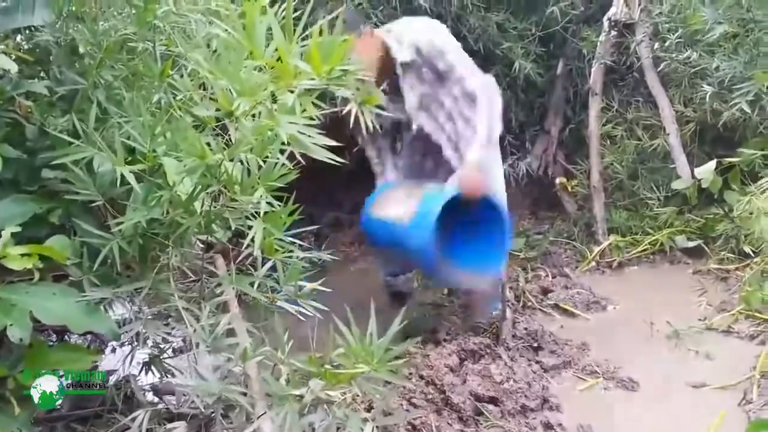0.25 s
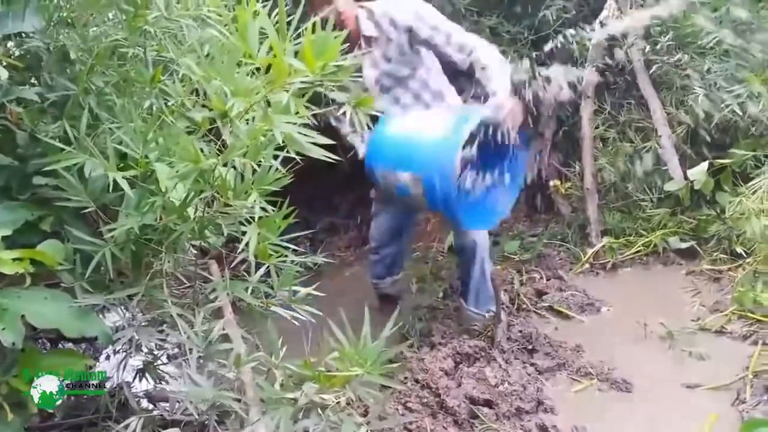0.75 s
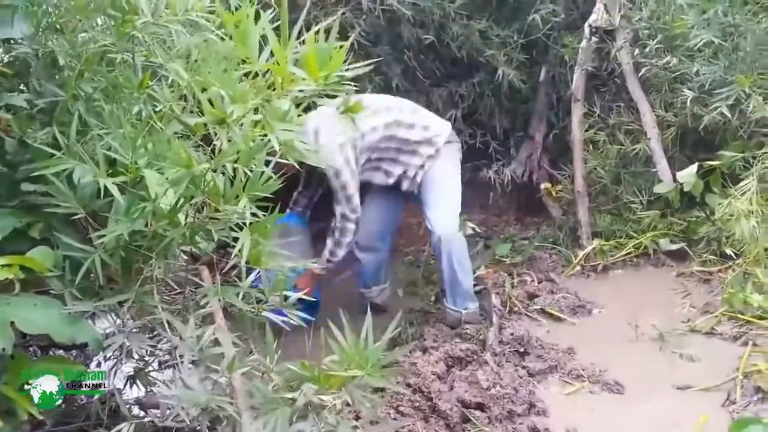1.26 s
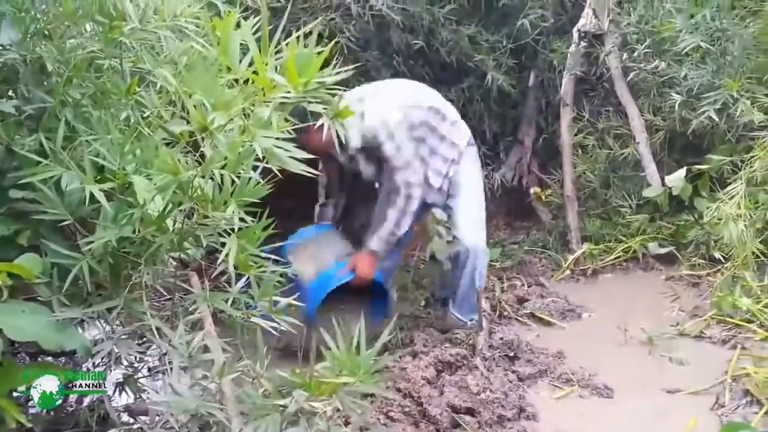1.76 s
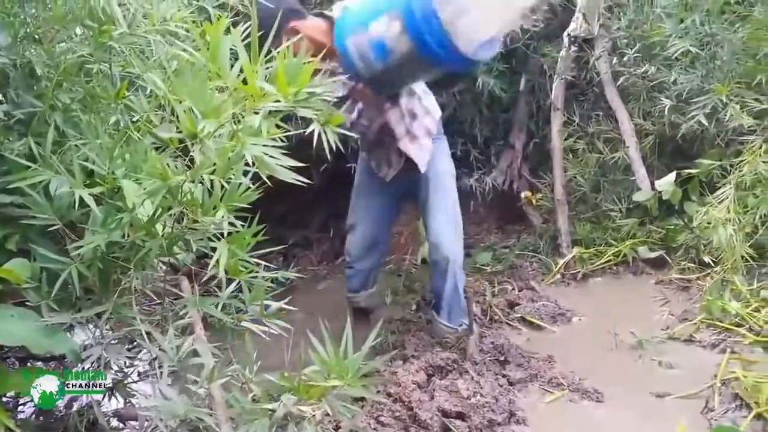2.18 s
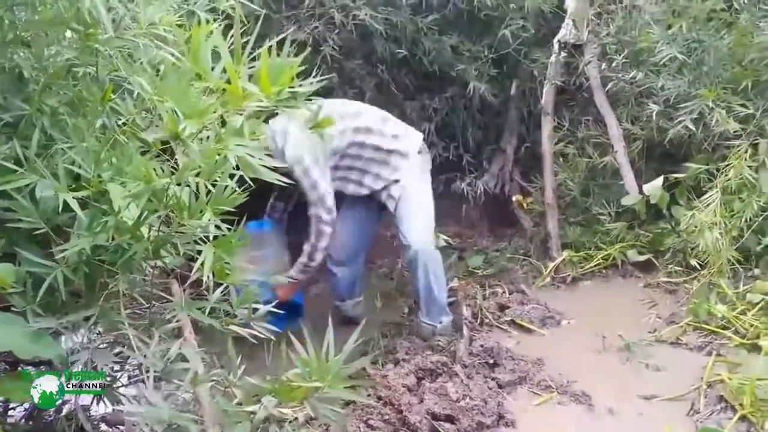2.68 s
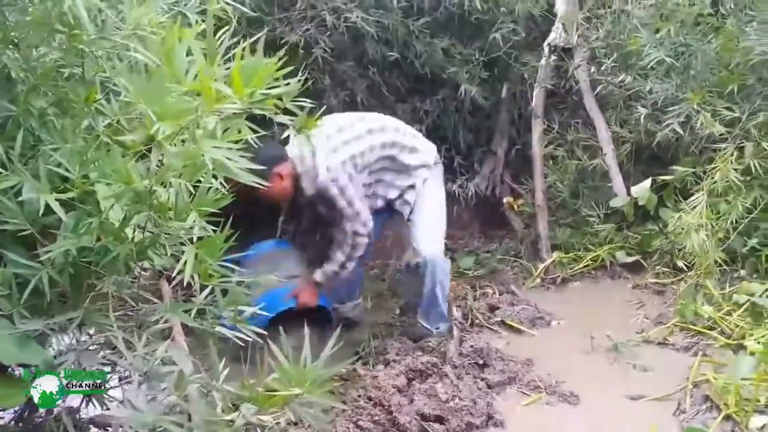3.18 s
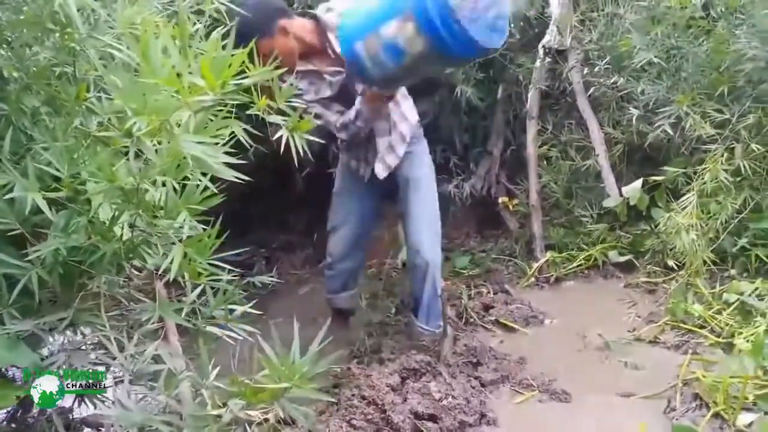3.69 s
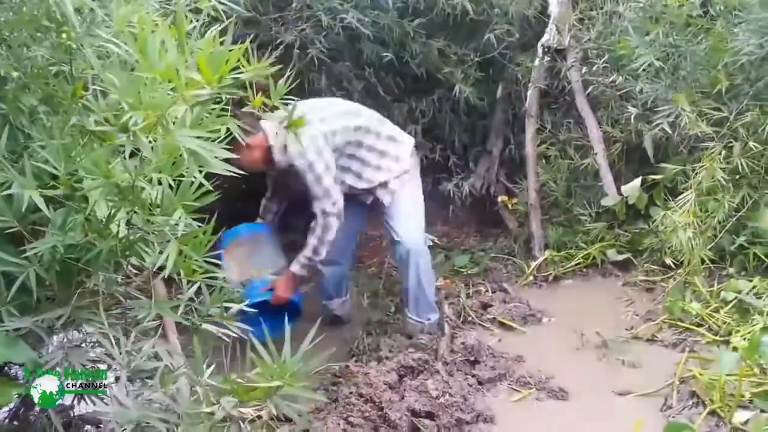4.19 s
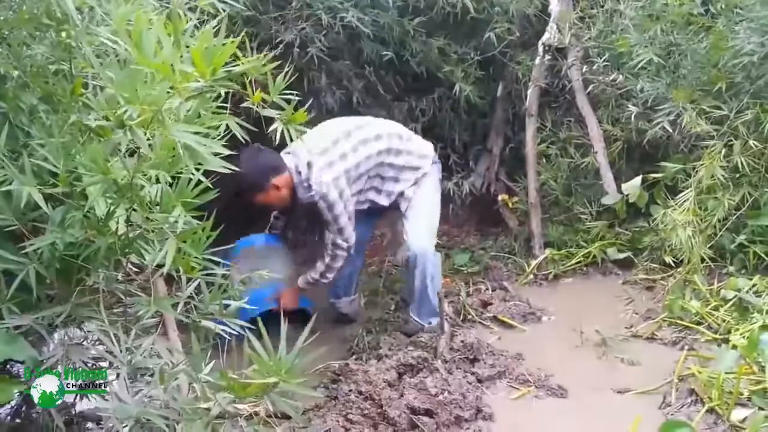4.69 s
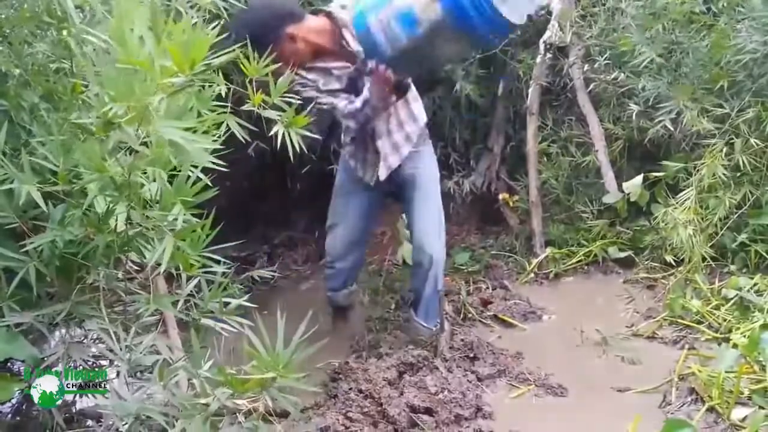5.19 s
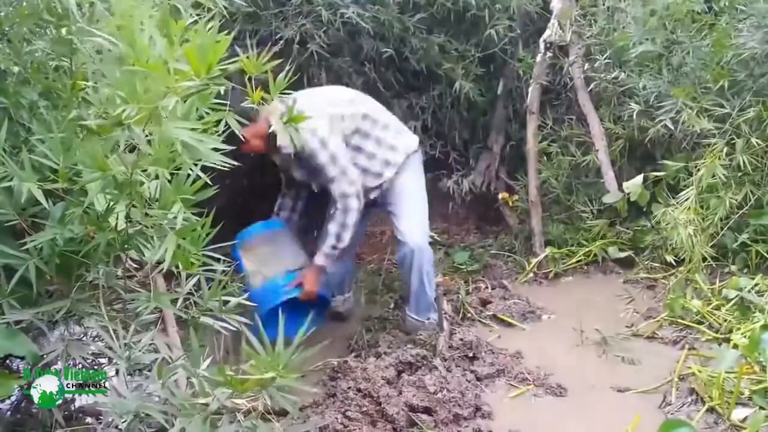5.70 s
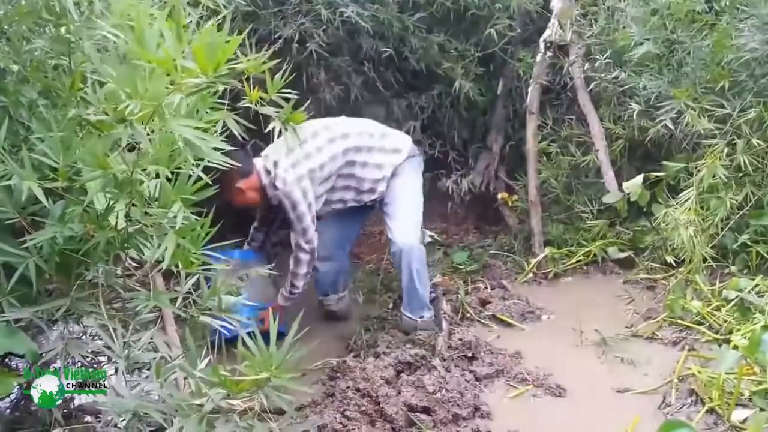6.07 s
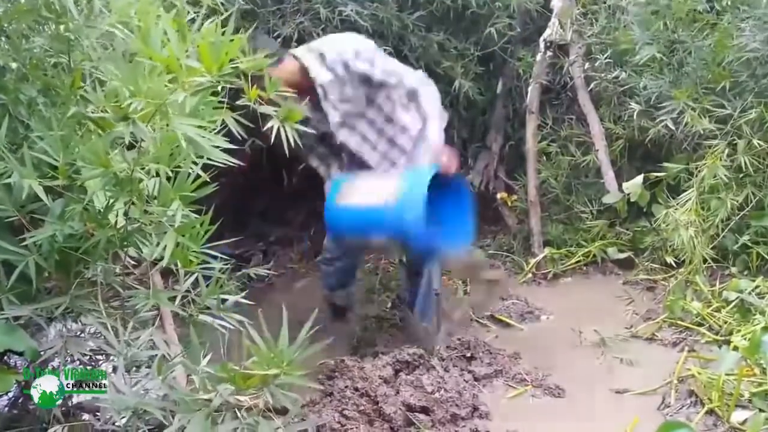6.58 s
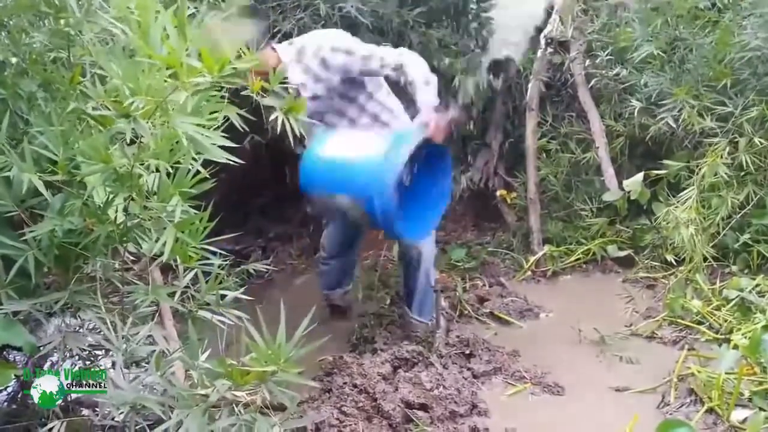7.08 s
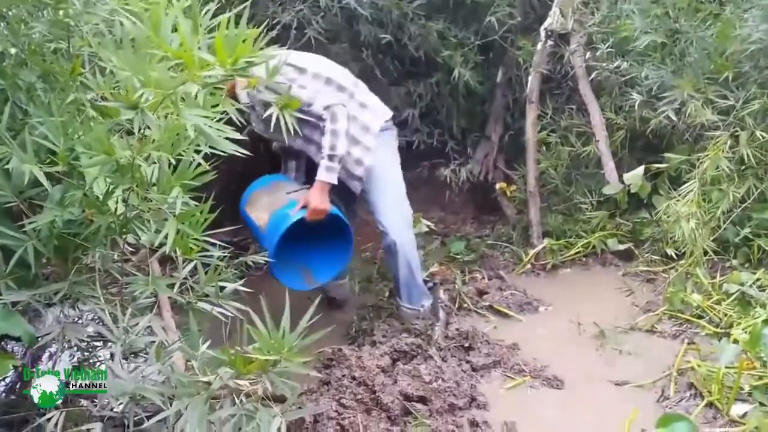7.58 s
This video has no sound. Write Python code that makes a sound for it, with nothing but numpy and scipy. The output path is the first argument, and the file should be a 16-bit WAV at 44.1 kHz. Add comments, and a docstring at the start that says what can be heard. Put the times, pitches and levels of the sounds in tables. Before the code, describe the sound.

A plastic bucket bails muddy water among bushes, heard fairly close in dry open air over faint steady hiss. At the start, a tail of falling drops and a low gulp lead to dull knocks at 0.2 s, a splashy rush and a hollow clack near 0.45. Water showers on leaves from 1.0 to 1.5 with wet smacks. A quiet dip around 1.6 gurgles; the second pour rushes from 1.85 to 2.3, clacking at 2.1 and 2.4, with its shower peaking near 2.9. The third dip gulps at 3.1, knocks and pours from 3.35, clatters at 3.6, and patters down from 4.1 to 4.75. The fourth haul starts at 4.86, louder, with sharp clatter around 5.1 and a lighter shower from 5.6 to 6.3. The fifth brings heavy thuds and deep loud gulps at 6.5, a short strong rush, a clack at 6.8, light taps near 7.1, and a final shower swelling towards 7.6.

```python
"""A plastic bucket bails a muddy pool among bushes, five throws: noise cracks and decaying wall modes make
its dull knocks when full and its clatter when nearly empty. Rising sine bubbles gulp as it dips, and
patter, ringing drops and gurgle make the rush over its lip. Loads come down as showers of the same water
on leaves and mud, with smacks of chattering noise; a faint coloured hiss lies behind."""
import sys
import numpy as np
from scipy import signal
from scipy.fft import rfft, irfft, next_fast_len
from scipy.io import wavfile
from scipy.ndimage import uniform_filter1d

SR = 44100
rng = np.random.default_rng(int(sys.argv[2]) if len(sys.argv) > 2 else 0)


def store_wav(level_fs):
    """Save 16-bit WAV to argv[1]."""
    pcm = np.round(np.clip(np.atleast_2d(level_fs), -1, 1) * 32767)
    wavfile.write(sys.argv[1], SR, pcm.T.astype(np.int16))


N = 346163
TIME = np.arange(N) / SR
HIT_TIME = TIME[:SR // 3]
LEAD_S = .015  # room for the scrape ahead of a contact


def undb(db):
    """Decibels to gain."""
    return 10 ** (np.asarray(db) / 20)


def level(x, db=0):
    """Scale a sound to an rms level."""
    return x * undb(db) / np.sqrt(np.mean(x ** 2))


def add(out, s, sound):
    """Mix a sound in at a given time."""
    start = max(int(s * SR), 0)
    out[..., start:start + sound.shape[-1]] += sound[..., :N - start]


def along(points, hz):
    """Read (Hz, value) points on a log-frequency axis."""
    f, value = np.transpose(points)
    return np.interp(np.log(hz + 1), np.log(f), value)


def ramp(t, length):
    """Rise from 0 to 1 over a given time."""
    return np.clip(t / length, 0, 1)


def fall(t, db_per_s):
    """Hold full gain until time 0, then fade steadily."""
    return undb(-db_per_s * np.maximum(t, 0))


def place(pair, colour, balance, alike_hz=1100, tilt=0):
    """Colour two unrelated sounds causally into left and right: alike in the bass, apart in the treble."""
    size = next_fast_len(pair.shape[1] + 2048, True) // 2 * 2
    hz = np.arange(size // 2 + 1) * SR / size
    turn = np.pi / 4 * (hz + 1) / np.hypot(hz + 1, alike_hz)
    mid, side = rfft(pair, size)
    shared, apart = mid * np.cos(turn), side * np.sin(turn)
    ears = np.array([shared + apart, shared - apart])
    lean = undb(along(balance, hz))
    pan = np.array([lean, np.ones_like(lean)]) / np.hypot(lean, 1)
    # fold the cepstrum forward in time for a minimum-phase filter
    log_gain = np.log(undb(along(colour, hz))) + tilt * np.log(np.clip(hz, 700, 6000) / 2000)
    cepstrum = irfft(log_gain)
    causal = np.exp(rfft(2 * cepstrum[:size // 2], size) - cepstrum[0])
    return irfft(ears * causal * pan)[:, :pair.shape[1]]


def contacts(length, rate, bounce, scrape=0):
    """A brief scrape swells into one sharp contact, followed by a dying chatter of smaller ones."""
    t = HIT_TIME - LEAD_S
    before = scrape * undb(20 * np.minimum(t, 0) / LEAD_S)
    after = bounce * undb(-40 * np.abs(t) / np.clip(length, .004, .25))
    size = np.where(t < 0, before, after)
    train = (rng.random(len(t)) < rate / SR) * rng.standard_normal(len(t)) * size
    train[int(LEAD_S * SR)] = 1
    return train[None]


def burst(t60):
    """Two unrelated bursts of noise that die away exponentially."""
    return rng.standard_normal((2, len(HIT_TIME))) * np.exp(-np.log(1000) * HIT_TIME / t60)


def attack(x):
    """Scale a blow to unit rms over its loudest 8 ms."""
    return x / np.sqrt(uniform_filter1d(np.mean(np.atleast_2d(x), axis=0) ** 2, SR // 125).max())


# What the bucket wall rings with. Each row: pitch in Hz, relative level in dB, t60 in s at a damping of 1.
WALL_MODES = [(145.8, -8, 0.26), (424, -12, 0.067), (785, -6, 0.24), (903.5, 1, 0.14), (964, 7, 0.053),
              (1269, -1.5, 0.14), (1348, 0, 0.098), (1630, -25, 0.099), (2070, -1, 0.14),
              (2440, -1.5, 0.14), (2570, 1.5, 0.2), (2848, 6, 0.059), (3860, -12, 0.043)]
# Stereo lean of the bucket. Each row: frequency in Hz, left minus right in dB.
BUCKET_LEAN = [(400, 2.5), (950, 1.5), (2300, 16), (4400, 16), (7500, 4), (10500, -42)]


def bucket_ring(damping):
    """The wall's modes die away together, weighted and detuned a little at random for each blow."""
    hz, db, t60 = np.transpose(WALL_MODES)[:, :, None]
    weight, detune, phase = rng.standard_normal((3, len(hz), 1))
    modes = undb(db + 0.65 * weight) * np.exp(-np.log(1000) * HIT_TIME * damping / t60)
    modes = modes * np.sin(2 * np.pi * hz * (1 + 0.0047 * detune) * HIT_TIME + np.pi * phase)
    lean = undb(along(BUCKET_LEAN, hz))
    return np.array([np.sum(modes * side / np.hypot(lean, 1), axis=0) for side in (lean, 1)])


def blows(s, db, gap, rebound_db, length):
    """A knock lands twice: first contact and rebound, each as (s, dB, chatter s); the first chatters less."""
    return [(s, db, 0.9 * length), (s + gap, rebound_db, length)]


def knocks(table, colour, gain_db, ring_db, damping, crack_t60, bounce, scrape_db, bank_db, uneven_db):
    """Chattering blows crack the plastic and ring its wall; the banks scatter a short tail."""
    out = np.zeros((2, N))
    for *knock, tilt in table:
        for s, db, length in blows(*knock):
            # the lighter the tap, the more scrape leads into it
            scrape = min(undb(scrape_db - db), 0.5)
            train = contacts(length, rate=1100, bounce=bounce, scrape=scrape)
            # each spot on the wall has its own peaks and dips
            spot = [(hz, along(colour, hz) + uneven_db * rng.standard_normal())
                    for hz in np.geomspace(60, 15000, num=60)]
            noise = burst(crack_t60) + undb(bank_db) * burst(0.16)
            crack = place(noise, spot, BUCKET_LEAN, alike_hz=970, tilt=tilt)
            crack = signal.fftconvolve(crack, train, axes=1)[:, :len(HIT_TIME)]
            add(out, s - LEAD_S, undb(db + gain_db) * attack(crack))
            # the ring weakens less than the crack on a light tap
            add(out, s, undb(0.73 * db + gain_db + ring_db) * attack(bucket_ring(damping)))
    return out


# Knocks on the full bucket. Each row: start in seconds, level in dB before the trim, rebound delay in s,
# rebound level in dB before the trim, chatter length in s, tilt (exponent, + brighter, - duller).
FULL_HITS = [(0.202, -10.5, 0.025, -19.5, 0.049, -0.83), (0.259, -13.5, 0.012, -42, 0.01, -0.14),
             (3.355, -9, 0.021, -14, 0.066, -0.78), (4.865, -8.5, 0.013, -6.5, 0.037, -0.5),
             (6.433, -7.5, 0.023, -12, 0.05, -0.62), (6.492, -9.5, 0.039, -16.5, 0.12, -1.3)]
# Tone of the full bucket. Each row: frequency in Hz, relative level in dB.
FULL_TONE = [(120, -29.5), (200, -15.5), (435, -21.5), (521, -30.5), (1050, -2.5), (1220, -7.5),
             (1660, 0.5), (1880, -6.5), (2900, -2), (7970, -21), (13200, -36), (15000, -54)]


def full_knocks():
    """The full bucket knocks dully as it is hauled: strongly damped, with little ring."""
    return knocks(FULL_HITS, FULL_TONE, gain_db=-8.5, ring_db=-27.0, damping=1.3, crack_t60=0.026,
                  bounce=0.56, scrape_db=-28, bank_db=-14.0, uneven_db=4.5)


# Knocks of rim and handle on the nearly empty bucket. Each row: start in seconds, level in dB before the
# trim, rebound delay in s, rebound level in dB before the trim, chatter length in s, tilt (exponent).
EMPTY_HITS = [(0.451, -11.5, 0.031, -12.5, 0.033, -0.49), (0.734, -23, 0.026, -21.5, 0.047, -0.77),
              (0.855, -35.5, 0.014, -37, 0.048, -1.75), (2.122, -9.5, 0.031, -10.5, 0.073, -0.63),
              (2.377, -9.5, 0.026, -16.5, 0.022, -0.47), (3.583, -9, 0.031, -8, 0.079, -0.54),
              (3.757, -21, 0.019, -27.5, 0.045, -0.3), (3.886, -21, 0.037, -25.5, 0.064, -0.76),
              (4.997, -17.5, 0.013, -11, 0.048, -0.82), (5.116, -6, 0.026, -9, 0.02, -0.38),
              (5.155, -11.5, 0.019, -14, 0.077, -0.53), (5.394, -17, 0.027, -23.5, 0.036, -0.7),
              (5.489, -26, 0.015, -42, 0.035, -0.029), (6.792, -10, 0.027, -20.5, 0.053, -0.67),
              (7.093, -25.5, 0.025, -14, 0.015, -0.45), (7.18, -36.5, 0.04, -46, 0.026, -1.2)]
# Tone of the nearly empty bucket. Each row: frequency in Hz, relative level in dB.
EMPTY_TONE = [(59, -24), (100, -22), (204, -27.5), (407, -11.5), (546, -20), (942, -4.5), (1530, -10),
              (2320, 3.5), (3110, -6), (3920, 0.5), (8340, -22), (13500, -33.5), (15000, -61)]


def empty_knocks():
    """Rim and handle clatter on the nearly empty bucket, whose wall rings freely."""
    return knocks(EMPTY_HITS, EMPTY_TONE, gain_db=-7.5, ring_db=-8.0, damping=1.0, crack_t60=0.021,
                  bounce=1.0, scrape_db=-18, bank_db=-12.0, uneven_db=4.0)


def bubble(hz, t60, rise, swell):
    """An air pocket rings down and rises in pitch (octaves per s) as it nears the surface."""
    t = TIME[:int(max(t60, .002) * SR)]
    phase = 2 * np.pi * np.cumsum(hz * 2 ** (rise * t)) / SR
    return np.sin(phase) * 1000 ** (-t / t60) * (1 - np.exp(-t / swell))


# Air pockets, from gulps under the rim to little plops.
# Each row: start in seconds, peak of the ring in dB, starting pitch in Hz, t60 in s.
AIR_POCKETS = [(0.0, -28, 142, 0.1), (0.405, -27, 173, 0.086), (1.057, -30.5, 830, 0.035),
               (1.577, -34.5, 140, 0.17), (2.054, -20.5, 705, 0.043), (3.122, -17.5, 162, 0.076),
               (3.368, -29.5, 223, 0.27), (4.699, -25.5, 177, 0.052), (4.73, -26, 767, 0.049),
               (4.867, -20, 186, 0.14), (6.246, -28.5, 146, 0.12), (6.497, -4.5, 163.3, 0.12),
               (6.509, -4, 204, 0.062), (6.563, -23.5, 214, 0.16), (6.637, -27.5, 241, 0.125)]
# Tone of the thud against the bucket. Each row: frequency in Hz, relative level in dB.
THUD_TONE = [(30, -28), (110, 2), (200, 4), (370, -4), (600, -21), (3000, -69)]
# Stereo lean of the water, also used for the air. Each row: frequency in Hz, left minus right in dB.
WATER_LEAN = [(700, 3.5), (1300, 2.5), (2400, 10), (4900, 13), (8000, -2), (14000, -2.5)]


def gulps(rise=1.0, thud_db=-14, shed_db=-19):
    """Trapped air rings; the large pockets also thud against the bucket and shed smaller bubbles."""
    out = np.zeros((2, N))
    for s, db, hz, t60 in AIR_POCKETS:
        ring = bubble(hz, t60, rise, swell=0.31 / hz)
        add(out, s, undb(db) * ring / np.abs(ring).max())
        if hz < 400:
            thud = place(burst(1.2 * t60), THUD_TONE, WATER_LEAN)
            add(out, s, undb(db + thud_db) * attack(thud))
            for delay, size in rng.random((5, 2)):
                small_hz = hz * (2 + 5 * size)
                small = bubble(small_hz, 18 / small_hz, 3.2, swell=.5 / small_hz)
                add(out, s + 0.076 * delay, undb(db + shed_db) * 2 * hz / small_hz * small)
    return out


def walk(rate):
    """Slow chance with a spread near 1, drawn anew a given number of times a second and smoothed."""
    k = int(SR / rate)
    steps = np.repeat(rng.standard_normal(N // k + 1), k)
    return 1.3 * uniform_filter1d(uniform_filter1d(steps, k), k)[:N]


def bubbles(count, low_hz, high_hz, cycles, spread_db):
    """Many small bubbles of all sizes, scattered in time."""
    out = np.zeros((2, N))
    for when, size, loud, life, left, right in rng.random((count, 6)):
        hz = low_hz * (high_hz / low_hz) ** size
        t60 = cycles * (.5 + life) / hz
        gain = undb(-spread_db * np.log(0.25 + loud)) * hz / high_hz
        ring = gain * bubble(hz, t60, 0.26 / t60, swell=.5 / hz)
        add(out, when * N / SR, np.outer([np.sign(left - .5), 2 * right - 1], ring))
    return level(out)


def patter(rate, spread_db, smear_s):
    """Impacts of drops, a few large among many small, each a tiny burst of hiss."""
    drops = (rng.random(N) < rate / SR) * undb(spread_db * np.minimum(rng.exponential(size=N), 5))
    power = signal.lfilter([1], [1, -np.exp(-1 / (smear_s * SR))], drops ** 2)
    return level(np.sqrt(power) * rng.standard_normal((2, N)))


def splats(rate, cycles, spread_db):
    """Drops of many sizes, each ringing for only a few cycles at the pitch of its size."""
    out = np.zeros((2, N))
    for hz in np.geomspace(1200, 11000, num=12):
        # small, high drops are more numerous and each is weaker
        crowd = hz / 2500
        drops, count = np.zeros((2, N)), int(rate * crowd * N / SR)
        when, size, left, right = rng.random((count, 4)).T
        sides = np.array([np.sign(left - .5), 2 * right - 1])
        drops[:, (when * N).astype(int)] = sides * undb(-spread_db * np.log(0.024 + size))
        out += signal.lfilter(*signal.iirpeak(hz, cycles, fs=SR), drops) / np.sqrt(crowd)
    return level(out)


# Tone of the heavy, gurgling water. Each row: frequency in Hz, relative level in dB.
SLOSH_TONE = [(30, -16), (80, -2.5), (150, 3.5), (450, -7), (900, -5), (1700, -0.5), (3200, 3.5),
              (8000, -56)]


def water(fine, heavy, colour, hiss_db, slosh_db, drop_rate, spread_db):
    """Fine drops patter, larger ones splat, and heavier lumps of water gurgle below."""
    larger = undb(-3.5) * splats(rate=220, cycles=7, spread_db=3)
    drops = patter(drop_rate, spread_db, smear_s=0.0037) + larger
    spray = level(place(drops, colour, WATER_LEAN), hiss_db)
    gurgle = undb(-5) * bubbles(count=3000, low_hz=220, high_hz=1500, cycles=9, spread_db=3)
    lumps = patter(500, 0.97, smear_s=0.014) + gurgle
    slosh = level(place(lumps, SLOSH_TONE, WATER_LEAN), slosh_db)
    surge = undb(walk(60))  # wavers by about a decibel
    return surge * (fine * spray + heavy * slosh)


# The bucket dips and fills. Each row: time of the fullest slosh in seconds, its level in dB before mixing.
DIP_TIMES = [(0.0, -35), (1.63, -45.5), (3.11, -39.5), (4.73, -36.5), (6.259, -40)]
DIP_RISE_DB_PER_S, DIP_FALL_DB_PER_S = 53, 107


def dip_flow():
    """Water runs in faster as the rim sinks and stops once the bucket is full."""
    flow = 0
    for s, db in DIP_TIMES:
        flow = flow + undb(db) * fall(s - TIME, DIP_RISE_DB_PER_S) * fall(TIME - s, DIP_FALL_DB_PER_S)
    return flow


# The bucket is swung up and sheds its water. Each row: start in seconds, rush level in dB before mixing,
# length of the swing in s, level of the trailing dribble in dB before mixing.
SWINGS = [(0.188, -41.5, 0.33, -49), (1.848, -41, 0.42, -47.5), (3.356, -38.5, 0.35, -46),
          (4.859, -35, 0.32, -42.5), (6.442, -33.5, 0.21, -42)]
POUR_ATTACK_S, POUR_FALL_DB_PER_S, DRIBBLE_FALL_DB_PER_S = 0.057, 154, 24.5
DRIBBLE_END_S = 0.58  # the bucket runs dry this long after the swing began


def pour_flow():
    """Water rushes over the lip for as long as the swing lasts, then dribbles until the bucket is dry."""
    flow = np.zeros(N)
    for s, db, swing, dribble_db in SWINGS:
        t = TIME - s
        rush = undb(db) * fall(t - swing, POUR_FALL_DB_PER_S)
        dribble = undb(dribble_db) * fall(t - swing, DRIBBLE_FALL_DB_PER_S)
        dribble = dribble * fall(t - DRIBBLE_END_S, POUR_FALL_DB_PER_S)
        flow += ramp(t, POUR_ATTACK_S) * np.maximum(rush, dribble)
    return flow


# Tone of the rush over the lip. Each row: frequency in Hz, relative level in dB.
RUSH_TONE = [(350, -37.5), (600, -6), (765, -0.5), (1350, -9), (1630, -4), (4290, 3.5), (8520, -11),
             (13300, -10), (15000, -26)]
POUR_SLOSH_DB = -7.5  # slosh in the bucket relative to the rush, before mixing
DIP_SPRAY_DB = -8.5  # spray at the rim relative to the slosh, before mixing


def pours_and_dips():
    """Pouring is mostly rush with some slosh behind it, filling mostly slosh with some spray at the rim."""
    pouring, filling = pour_flow(), dip_flow()
    fine = pouring + undb(DIP_SPRAY_DB) * filling
    heavy = undb(POUR_SLOSH_DB) * pouring + filling
    return water(fine, heavy, RUSH_TONE, hiss_db=7.0, slosh_db=4.0, drop_rate=7300, spread_db=6.0)


# Thrown loads coming down. Each row: first drops in seconds, peak level in dB before mixing,
# build-up in s, thinning-out in s.
LANDINGS = [(-0.4, -31.5, 0.36, 0.15), (0.978, -28, 0.13, 0.38), (2.575, -27.5, 0.32, 0.32),
            (4.088, -29.5, 0.4, 0.27), (5.628, -33, 0.46, 0.28), (7.29, -26, 0.32, 0.059)]
SHOWER_ONSET_S, FIRST_DROPS_DB = 0.012, -19.5  # the first drops, relative to the peak
THINNING_DB_PER_S, LAST_DROPS_DB_PER_S = 34, 158


def shower_flow():
    """A load lands: first drops, a build-up to the bulk of the water, a slow thinning, a quick end."""
    flow = np.zeros(N)
    for s, db, build, thin in LANDINGS:
        t = TIME - s
        swell = ramp(t, SHOWER_ONSET_S) * undb(db + FIRST_DROPS_DB * (1 - ramp(t, build)))
        thinning = fall(t - build, THINNING_DB_PER_S)
        flow += swell * thinning * fall(t - build - thin, LAST_DROPS_DB_PER_S)
    return flow


def from_left(pair, lag_s):
    """Delay the right side of a sound that reaches the left side first."""
    return np.array([pair[0], np.interp(TIME - lag_s, TIME, pair[1])])


# Tone of the showers. Each row: frequency in Hz, relative level in dB.
SHOWER_TONE = [(350, -31), (600, -8), (715, -9), (961, -13.5), (1960, -7.5), (3460, -7), (4400, 0),
               (5600, -1.5), (7150, -10), (13500, -10), (15000, -33)]
SHOWER_LUMPS_DB = -13.5  # heavy lumps relative to the spray


def showers():
    """Thrown water comes down on leaves and mud, mostly spray, reaching the left side first."""
    landing = shower_flow()
    fallen = water(landing, undb(SHOWER_LUMPS_DB) * landing, SHOWER_TONE,
                   hiss_db=5.5, slosh_db=5.5, drop_rate=1300, spread_db=1.5)
    return from_left(fallen, lag_s=0.0004)


# Clods and slaps of water on leaves and pool. Each row: start in seconds, level in dB before the trim,
# brightness (centre of the tone) in Hz, length of the spatter in s.
SLAPS = [(0.358, -15, 4230, 0.13), (0.413, -16.5, 2500, 0.036), (1.033, -21.5, 5340, 0.048),
         (1.0996, -24, 5270, 0.2), (1.1553, -12.5, 4070, 0.032), (1.56, -32, 3980, 0.059),
         (1.682, -35, 4120, 0.04), (1.807, -31.5, 3820, 0.09), (1.885, -22.5, 3970, 0.02),
         (1.9636, -15.5, 3640, 0.1), (2.584, -29, 5200, 0.028), (2.6394, -28, 5300, 0.018),
         (2.701, -23, 4940, 0.014), (2.7234, -19, 5550, 0.27), (2.8956, -13, 4740, 0.07),
         (3.3018, -30.5, 3360, 0.11), (3.475, -20, 4100, 0.1), (4.2936, -19, 3340, 0.0076),
         (4.4074, -18.5, 4970, 0.012), (5.2502, -22, 4800, 0.1), (5.306, -25.5, 5100, 0.11),
         (5.701, -34, 6750, 0.17), (5.925, -25, 4900, 0.006), (6.048, -22.5, 4400, 0.051),
         (6.151, -22, 2040, 0.048), (6.251, -24, 4060, 0.13), (6.526, -17, 2480, 0.026),
         (6.567, -13, 2660, 0.044)]


def smacks(gain_db=-7, ring_t60=0.024):
    """Lumps of mud and water burst on leaves and pool: short noise repeated by a chatter of contacts."""
    out = np.zeros((2, N))
    shape = ((.2, -15.5), (.45, -8), (1, 2), (1.5, -8.5), (3, -24))  # ratio to the brightness, dB
    for s, db, bright_hz, length in SLAPS:
        train = contacts(length, rate=1900, bounce=1.0)
        spatter = signal.fftconvolve(burst(ring_t60), train, axes=1)[:, :len(HIT_TIME)]
        colour = [(bright_hz * ratio, tone_db) for ratio, tone_db in shape]
        add(out, s - LEAD_S, undb(db + gain_db) * attack(place(spatter, colour, WATER_LEAN)))
    return out


# Tone of the background air. Each row: frequency in Hz, relative level in dB.
AIR_TONE = [(18, -30), (30, 7), (136, 12), (511, -0.5), (1400, 0), (5200, 9), (7800, -1), (13500, 0),
            (15000, -40)]


def air(rms_db=-49):
    """The faint hiss of the thicket and the stream: steady coloured noise."""
    return level(place(rng.standard_normal((2, N)), AIR_TONE, WATER_LEAN), rms_db)


def scene():
    """Dip, haul, throw and shower, over the quiet of the thicket."""
    bucket = full_knocks() + empty_knocks()
    falling = showers()
    return bucket + falling + pours_and_dips() + smacks() + gulps() + air()


def record(dry):
    """The recorder clips at full scale and cuts the top above 14.6 kHz."""
    top_cut = signal.ellip(8, .1, 60, 14600, fs=SR, output="sos")
    return signal.sosfiltfilt(top_cut, np.clip(dry, -1, 1))


dry = scene()
out = record(dry)
store_wav(out)
```